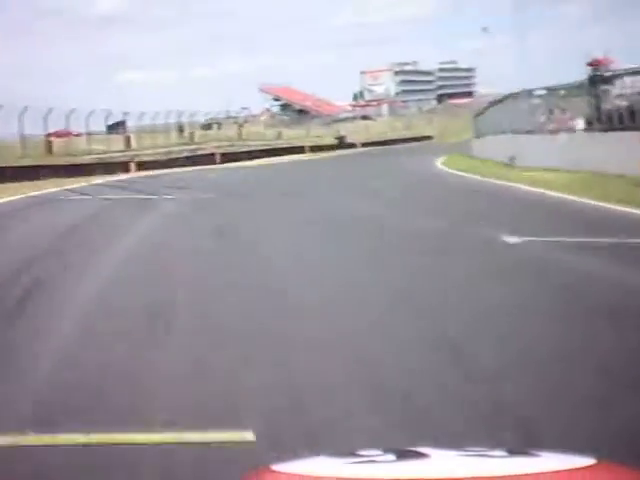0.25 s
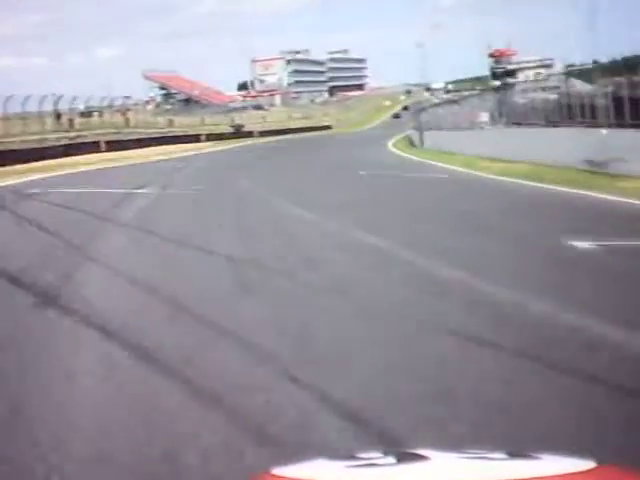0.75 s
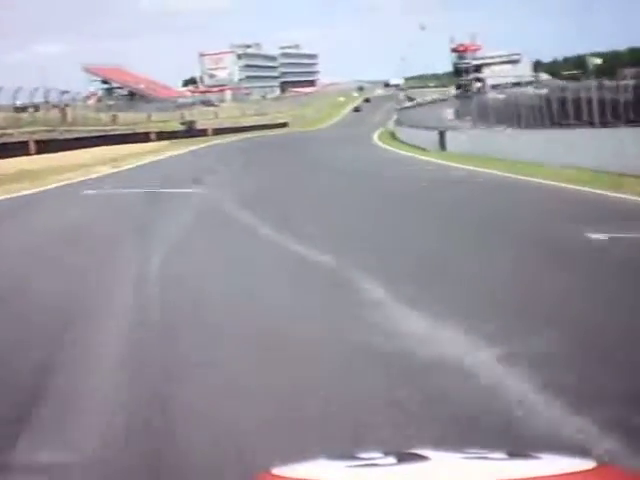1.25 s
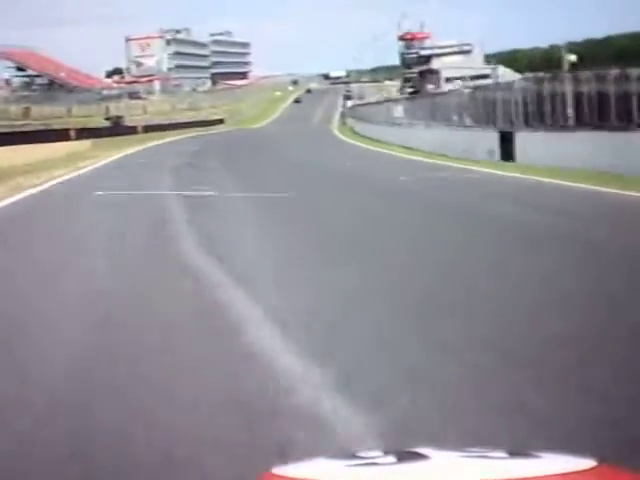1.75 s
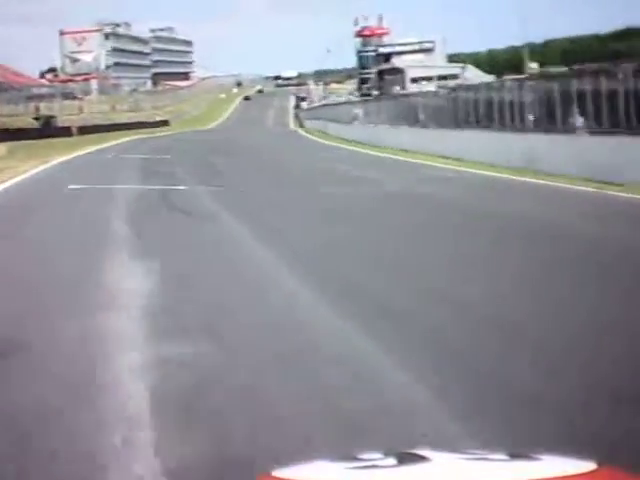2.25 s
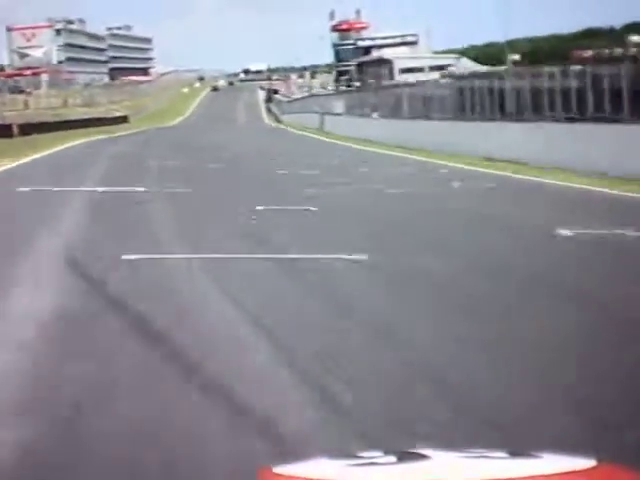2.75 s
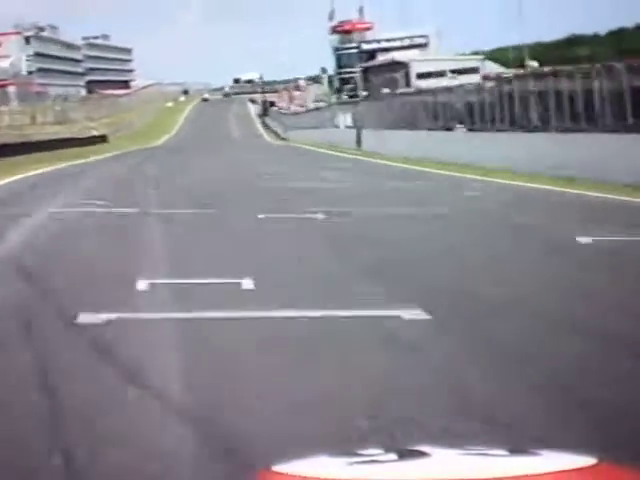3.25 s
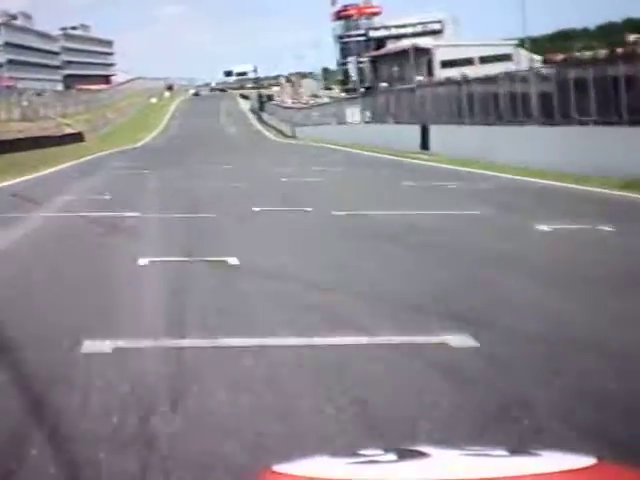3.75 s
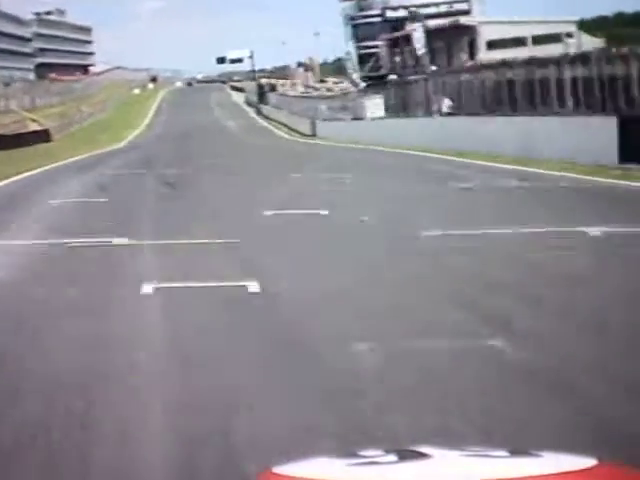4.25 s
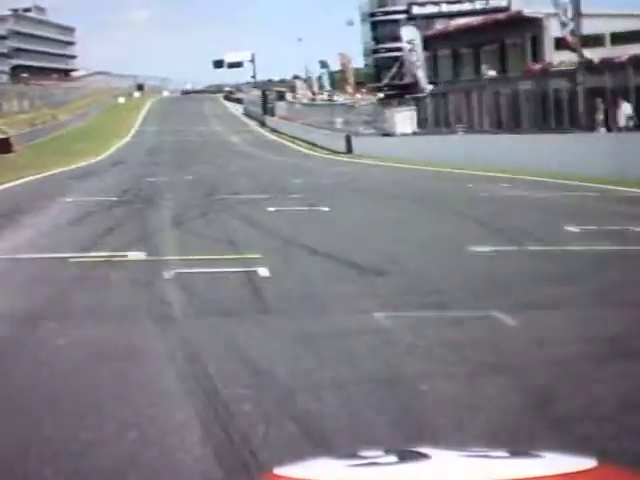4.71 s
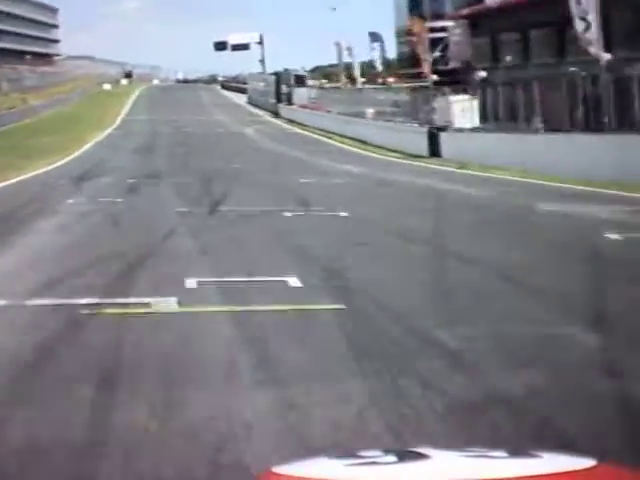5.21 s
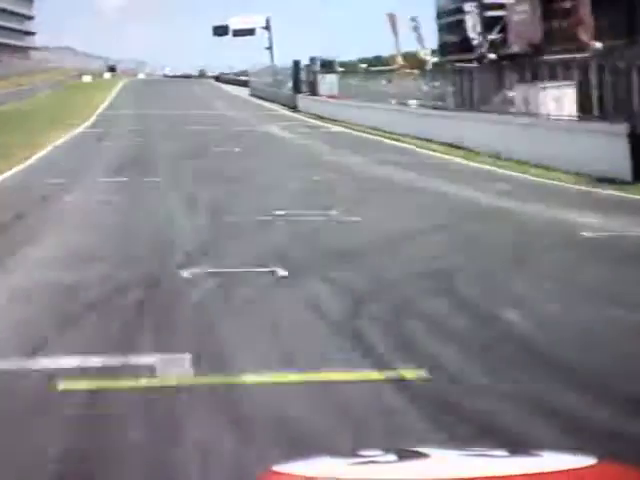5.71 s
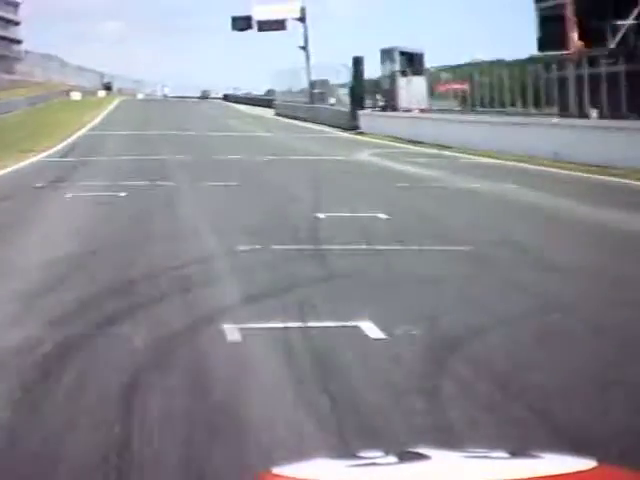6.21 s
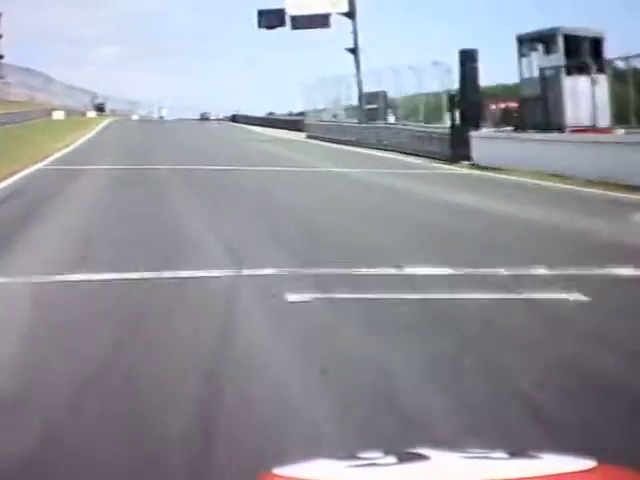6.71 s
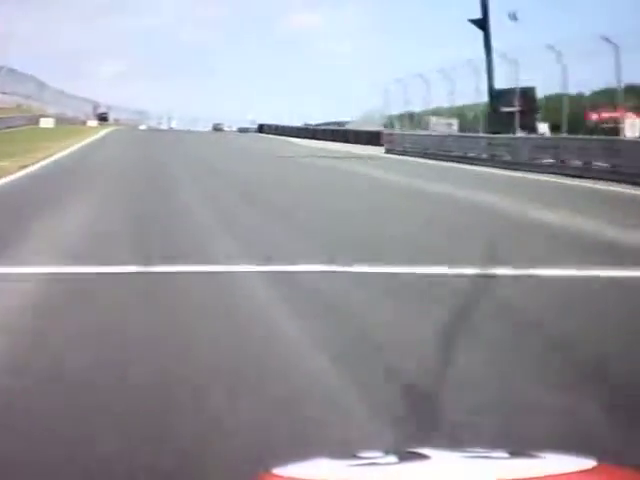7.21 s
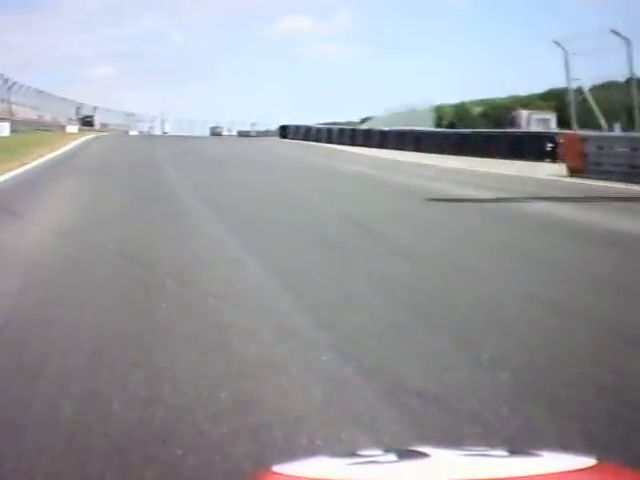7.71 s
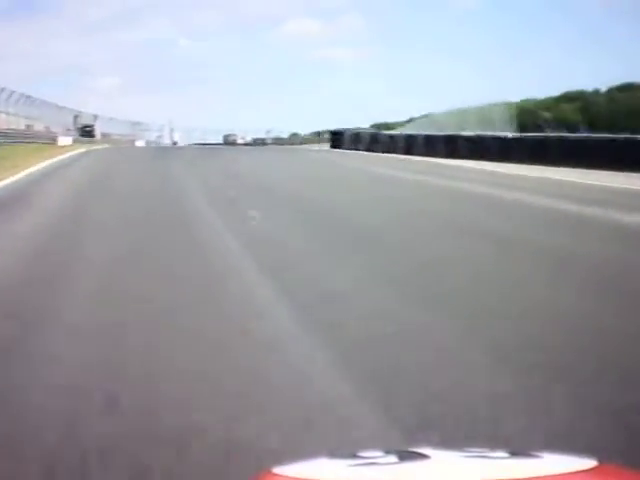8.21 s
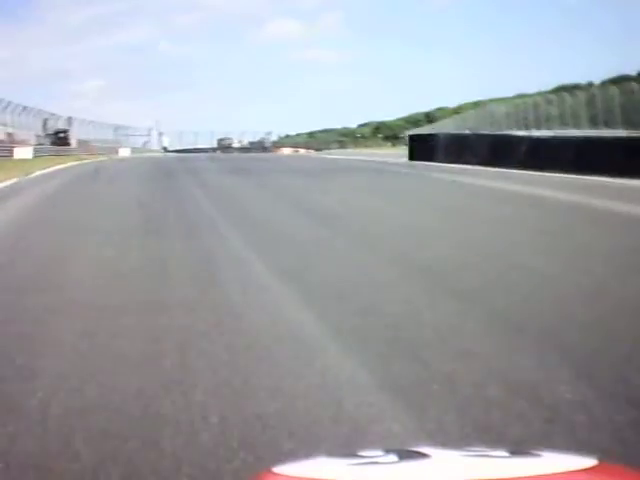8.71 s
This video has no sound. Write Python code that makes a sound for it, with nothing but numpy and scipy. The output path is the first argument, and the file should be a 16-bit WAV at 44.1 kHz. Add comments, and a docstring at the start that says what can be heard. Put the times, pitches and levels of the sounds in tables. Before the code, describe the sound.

Inside a small four-cylinder racing car on a straight, a buzzing, brassy engine note and a hard gear whine creep upward in one gear. Rough wind crackles constantly on the camera microphone. Approaching top speed, gusts choke the sound into rapid dropouts ending in sharp snaps. Near the end the throttle closes, the engine note weakens and pitch sinks. The sound is narrow, distorted and close.

```python
"""Racing car on a straight, on board

Microphone inside a small four-cylinder car that pulls up in one gear, then lifts off near the end.
Firing notes and body boom are sums of engine orders; a gear whines at multiples of crank speed.
Shaped noise gives the airstream, close on the camera's microphone, where random spikes crackle.
Near top speed gusts pin the diaphragm: the sound cuts out in stutters, each ending in a snap."""
import sys
import numpy as np
from scipy import signal
from scipy.fft import rfft, irfft
from scipy.io import wavfile
from scipy.ndimage import uniform_filter1d

SR = 44100
rng = np.random.default_rng(int(sys.argv[2]) if len(sys.argv) > 2 else 0)


def wav_record(signal):
    """Record a signal, one row per channel, as 16-bit PCM in the file named by sys.argv[1]."""
    frames = np.transpose(np.atleast_2d(signal))
    bounded = np.clip(frames, -1, 1)
    # unit amplitude maps onto the largest positive 16-bit level
    quanta = np.round(bounded * 32767).astype(np.int16)
    wavfile.write(sys.argv[1], SR, quanta)


N = 395136

# Crankshaft turns per second along the straight: time_s, crank_hz
CRANK_SPEED = [(0, 75.3), (1.3, 77.7), (3.7, 84.15), (5.3, 87.8), (6.5, 90), (7.7, 91), (8.3, 87.9),
               (8.96, 82.9)]
# Resonances, likely of exhaust and cockpit, that the firing note and its octave climb through:
# centre_hz, width_hz, level_db (relative)
FIRING_RESONANCES = [(167.16, 7.5, -13), (174.8, 11, -20.5), (315.4, 2.3, -7), (321.6, 11, -10.5),
                     (340.6, 11.5, -15.5)]
# Gear whine and its sidebands: crank_multiple, level_db (relative)
GEAR_LINES = [(9, -15), (17.5, -12), (18, 1), (18.5, -18), (26, -20), (27, -15), (36, -16)]
# Gear casing resonances: centre_hz, width_hz, level_db (relative)
CASING_MODES = [(742, 34, 4.5), (1399, 24, 1.5), (1489, 34, 1), (1535, 60, -7), (2075, 50, 3),
                (2215, 40, 7.5), (2745, 60, 2), (2998, 50, 8), (3185, 50, -1)]
# Cockpit and bodywork resonances: centre_hz, width_hz, level_db (relative)
BODY_RESONANCES = [(75.4, 16, 3), (217, 17, -2.5), (311, 20, -1), (345.9, 11, 1), (363.6, 72, -5.5),
                   (523.7, 28, -6), (623, 140, -12.5)]
# Spectrum of turbulence at the microphone: pitch_hz, density_db (relative, per Hz)
TURBULENCE = [(25, -32), (60, -15), (110, 0.5), (180, 3.5), (300, 3.5), (450, -2), (650, -5), (1000, -0.5),
              (1500, 0), (1900, -8), (2600, -9), (3400, -3), (4200, -26.5)]
# Airstream on the microphone: time_s, level_db (relative), diaphragm_load (0 to 1)
WIND_ON_MIC = [(0, -14, 0.73), (1.3, -16, 0.35), (1.7, -12.5, 0.55), (2.2, -14.5, 0.27), (4.5, -14, 0.58),
               (4.75, -17, 0.86), (5.75, -16.5, 0.76), (6.6, -18.5, 1), (7.4, -17.5, 0.9),
               (8.2, -16.5, 0.87), (8.55, -14, 0.54), (8.96, -15, 0.52)]
# Gusts that pin the diaphragm: start_s, end_s, snap_db (impulse as it breaks free, relative)
PINNING_GUSTS = [(4.875, 4.897, 4), (4.901, 4.911, 5), (4.927, 4.946, 7), (4.965, 4.988, 3),
                 (5.762, 5.783, -7), (5.843, 5.856, 3), (5.917, 5.936, -7), (6.057, 6.095, -4),
                 (6.262, 6.289, 3), (6.3, 6.322, 0), (6.368, 6.403, 1), (6.407, 6.445, -9),
                 (6.558, 6.581, 6), (6.587, 6.604, 5), (6.615, 6.681, 0), (6.694, 6.72, 5),
                 (6.735, 6.785, 4), (6.789, 6.841, 4), (6.853, 6.911, 0), (6.935, 6.965, -1),
                 (6.971, 7.028, 0), (7.066, 7.079, 3), (7.138, 7.163, -2), (7.172, 7.207, -3),
                 (7.229, 7.276, -2), (7.468, 7.487, 6), (7.497, 7.512, 3), (7.637, 7.666, 3),
                 (7.72, 7.746, -5)]

# Engine and gear
LIFT_S, LIFT_TAKES_S = 7.72, 0.44  # the throttle closes
OVERRUN_DB = -15  # firing note off throttle, relative
OVERRUN_OCTAVE_DB, COAST_WHINE_DB = 1.5, -7  # change of octave and whine off throttle
SHAKE_DB, SHAKE_DB_PER_HZ = -14, -1.05  # crank shake at the lowest speed; it smooths out as speed rises
WHINE_DB = -15.5
LOADED_DB = -3.5  # change of engine and gear at full wind load

# Microphone and camera
CRACKS_PER_S = 330  # base rate, scaled by the wind and the freedom of the diaphragm
STALL_DB, STALL_DB_PER_S = -11.5, -47.5  # sensitivity when pinned; it sinks while the gust lasts
PIN_S = 0.0005  # time constant of the diaphragm choking
DULL_SHARE, DULL_HZ = 0.61, 2200  # a loaded diaphragm loses treble
PING_DB, PING_HZ = -18, 3846  # the ping of an overloaded peak
VOICE_BAND_HZ, EDGE_HZ, TOP_HZ = 3446, 4820, 15900  # low-pass corners of the camera


def engine(angle, crank_hz, lift):
    """The crank shakes once a turn; two firings a turn give a note and brassy octave, loud at resonances."""
    shake_db = SHAKE_DB + SHAKE_DB_PER_HZ * (crank_hz - crank_hz.min())
    shake = undb(shake_db) * partial(angle, rough=0.083, rough_hz=7.1)

    pulling_gain = resonance(2 * crank_hz, FIRING_RESONANCES)
    note_gain = (1 - lift) * pulling_gain + lift * undb(OVERRUN_DB)
    note = note_gain * partial(2 * angle, rough=0.25, rough_hz=9.9)

    octave = partial(4 * angle, rough=0.18, rough_hz=4.1)
    brass = undb(-13) * partial(8 * angle, rough=.7, rough_hz=25)
    brass = brass + undb(-18) * partial(12 * angle, rough=.4, rough_hz=20)
    octave_gain = resonance(4 * crank_hz, FIRING_RESONANCES) * undb(OVERRUN_OCTAVE_DB * lift)
    return shake + note + octave_gain * (octave + brass)


def gear(angle, crank_hz, lift):
    """Meshing teeth whine; backlash wavers the lines together, and casing modes lift each as it passes."""
    lash = angle + 0.0023 * flutter(30)  # radians of the crank
    whine = sum(undb(db) * casing(k * crank_hz) * np.sin(k * lash) for k, db in GEAR_LINES)
    return whine * undb(WHINE_DB + COAST_WHINE_DB * lift + 2.2 * flutter(27))


def casing(f):
    """Gain of the gear casing at frequency f; between two neighbouring modes they cancel."""
    modes = (undb(db) / (1 + 2j * (f - hz) / width) for hz, width, db in CASING_MODES)
    return np.abs(sum(modes))


def boom(angle, crank_hz):
    """Unequal cylinders add half orders, heard with orders 3 and 6 through the body resonances."""
    orders = [2.5, 3, 3.5, 4.5, 6, 7.5]  # cycles per crank turn
    return sum(resonance(k * crank_hz, BODY_RESONANCES) * partial(k * angle, rough=0.64, rough_hz=10)
               for k in orders)


def road():
    """The road shakes the same body panels at random."""
    return noise(lambda f: resonance(f, BODY_RESONANCES))


def airstream():
    """Broad rush of turbulent air past the microphone."""
    hz, db = np.transpose(TURBULENCE)
    return noise(lambda f: undb(np.interp(np.log(f), np.log(hz), db)))


def chatter(load):
    """Eddies choke the diaphragm for milliseconds at a time; the harder the load, the deeper."""
    eddies = 1.0 * flutter(450) + 0.81 * flutter(90)
    gain = undb(load * 9.7 * np.tanh(eddies))
    local_power = uniform_filter1d(gain ** 2, SR // 8)
    return gain / np.sqrt(local_power)


def crackle(activity):
    """Random spikes that drive the preamp to its limit, most of them pushing the same way."""
    chance, side, size = rng.random((3, N))
    fires = chance < CRACKS_PER_S * activity / SR
    push = np.where(side < .7, 1, -1)
    return pops(fires * push * (.55 + 1.3 * size))


def snaps():
    """Breaking free at the end of each gust, the diaphragm slaps once."""
    impulses = np.zeros(N)
    for _, end, db in PINNING_GUSTS:
        impulses[int(end * SR)] = undb(db)
    return pops(impulses)


def pops(impulses):
    """Each impulse becomes a sharp-edged pressure spike that dies within half a millisecond."""
    decay = np.exp(-1 / (0.00016 * SR))
    return signal.lfilter([1], [1, -decay], impulses)


def stall(sound, outside):
    """While a gust pins the diaphragm only a faint, muffled trace of the sound outside gets through."""
    free, trace = np.ones(N), np.zeros(N)
    for start, end, _ in PINNING_GUSTS:
        span = np.arange(int(start * SR), int(end * SR))
        age_s = (span - span[0]) / SR
        free[span] = np.exp(-age_s / PIN_S)
        trace[span] = undb(STALL_DB + STALL_DB_PER_S * age_s)
    waver = undb(3 * flutter(60))
    muffled = waver * lowpass(outside, 2500, order=1)
    # gains are smoothed over about a millisecond
    return uniform_filter1d(free, size=40) * sound + uniform_filter1d(trace, size=40) * muffled


def spit(x):
    """Now and then a broad overloaded peak breaks into a tiny high ping."""
    pings_per_overloaded_s, limit, ping_s = 1500, .68, .002
    overloaded = np.abs(uniform_filter1d(x, size=36)) > limit
    fires = np.where(rng.random(N) < pings_per_overloaded_s / SR, overloaded, 0.)
    t = np.arange(int(ping_s * SR)) / SR
    ping = np.hanning(len(t)) * np.sin(2 * np.pi * PING_HZ * t)
    return undb(PING_DB) * signal.lfilter(ping, [1], fires)


def partial(angle, rough, rough_hz):
    """An engine line of rms near 1 whose strength and phase waver at random."""
    in_phase = (1 + rough * flutter(rough_hz)) * np.sin(angle)
    quadrature = rough * flutter(rough_hz) * np.cos(angle)
    return np.sqrt(2) * (in_phase + quadrature)


def resonance(f, table):
    """Gain of a set of resonances at frequency f, their powers added."""
    powers = (undb(2 * db) / (1 + (2 * (f - hz) / width) ** 2) ** 2 for hz, width, db in table)
    return np.sqrt(sum(powers))


def flutter(hz):
    """Random wander of spread 1, with little faster than hz."""
    return noise(lambda f: 1 / (1 + (f / hz) ** 4))


def noise(response):
    """Noise of rms 1 whose spectrum is a function of frequency."""
    f = np.arange(N // 2 + 1) * SR / N + 1e-3  # the offset keeps log(f) finite
    return unit(irfft(rfft(rng.standard_normal(N)) * response(f), N))


def lowpass(x, hz, order):
    """Butterworth low-pass."""
    return signal.sosfilt(signal.butter(order, min(hz, .45 * SR), fs=SR, output="sos"), x)


def curves(table):
    """Each column of a timed table, joined by straight lines."""
    time_s, *columns = np.transpose(table)
    return [np.interp(np.arange(N) / SR, time_s, column) for column in columns]


def undb(db):
    """Decibels to gain."""
    return 10 ** (np.asarray(db) / 20)


def unit(x):
    """Scale to rms 1."""
    return x / np.sqrt(np.mean(x ** 2))


def scene():
    """Engine, gear, body and wind, all heard through the one wind-loaded diaphragm."""
    (crank_hz,), (wind_db, load) = curves(CRANK_SPEED), curves(WIND_ON_MIC)
    lift = np.clip((np.arange(N) / SR - LIFT_S) / LIFT_TAKES_S, 0, 1)
    angle = 2 * np.pi * np.cumsum(crank_hz) / SR

    drive = engine(angle, crank_hz, lift) + gear(angle, crank_hz, lift)
    body = undb(-6.5) * boom(angle, crank_hz) + undb(-2.5) * road()
    car = undb(LOADED_DB * load) * drive + undb(wind_db - 2.85 * load) * body

    # load takes down the even rush, so the separate cracks stand out
    outside = car + undb(wind_db - 9 * load + 1.5) * airstream()
    freedom = chatter(load)
    cracks = crackle(freedom * undb(2 * (wind_db - wind_db.mean())))
    pressure = 0.2 * load  # steady push of the air: every stall starts and ends with a thump
    heard = stall(freedom * outside + cracks + pressure, outside) + snaps()

    dull = np.clip(DULL_SHARE * load ** 4, 0, 1)
    return ((1 - dull) * heard + dull * lowpass(heard, DULL_HZ, order=1))[None]


def record(dry):
    """A small camera: no deep bass, a saturating preamp, a telephone-wide band, tallest peaks clipped."""
    x = signal.sosfilt(signal.butter(1, 64, "high", fs=SR, output="sos"), dry)
    saturated = 0.62 * np.tanh(x / 0.52)
    x = lowpass(saturated, VOICE_BAND_HZ, order=6) + spit(x)
    x = signal.sosfilt(signal.cheby2(16, 62, EDGE_HZ, fs=SR, output="sos"), x)
    x = np.clip(x, -.69, .69)
    return signal.sosfilt(signal.ellip(8, .2, 70, TOP_HZ, fs=SR, output="sos"), x)


dry = scene()
out = record(dry)
wav_record(out)
```